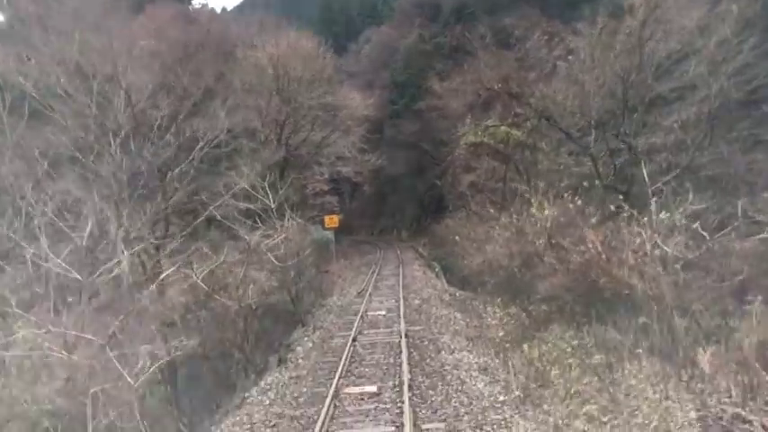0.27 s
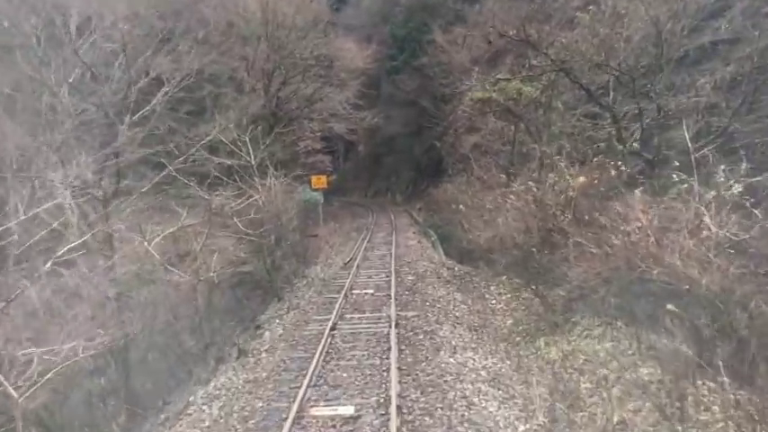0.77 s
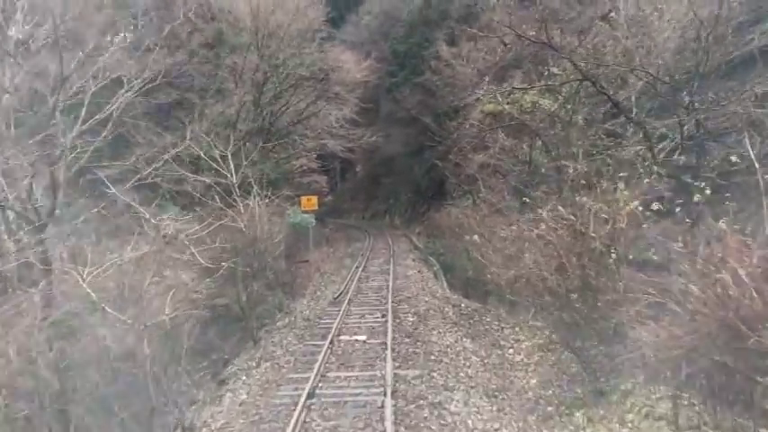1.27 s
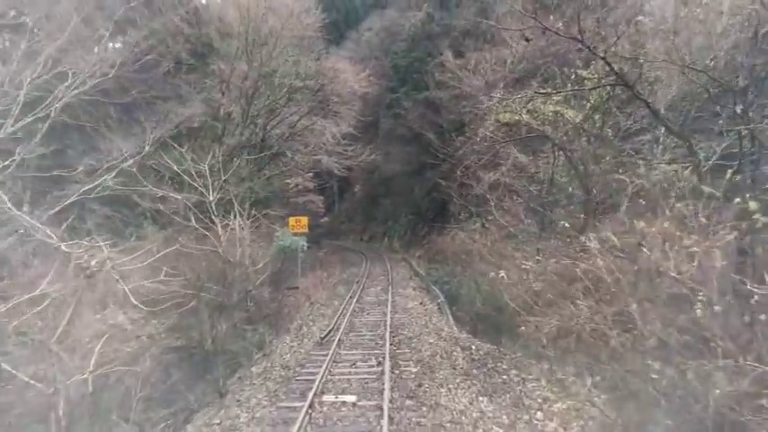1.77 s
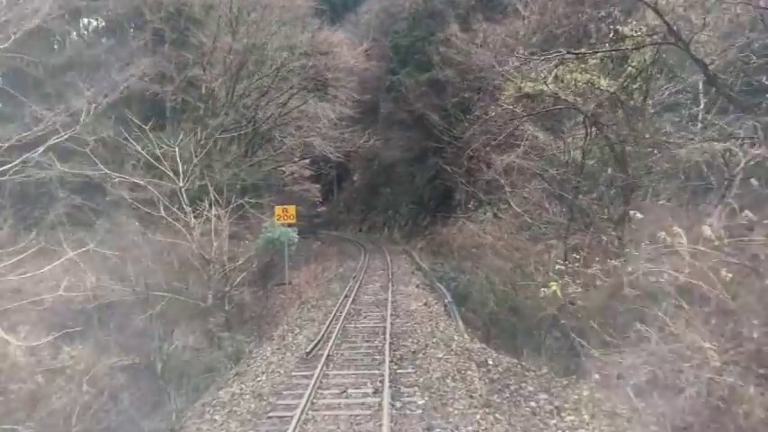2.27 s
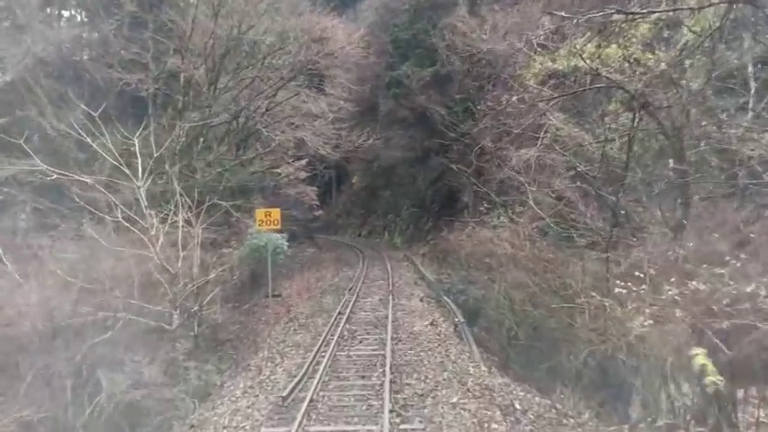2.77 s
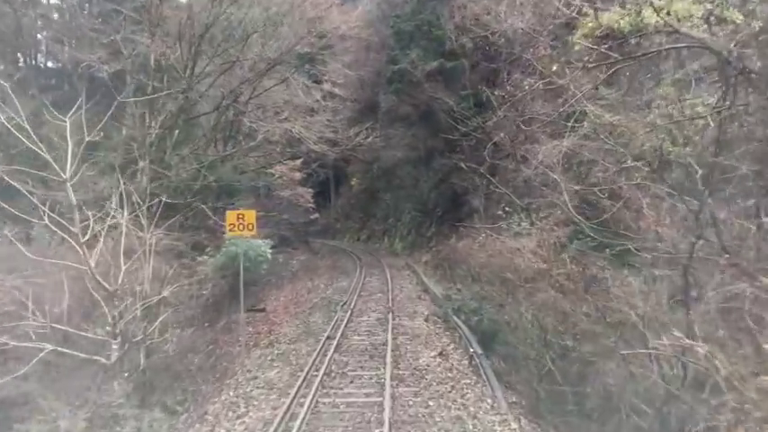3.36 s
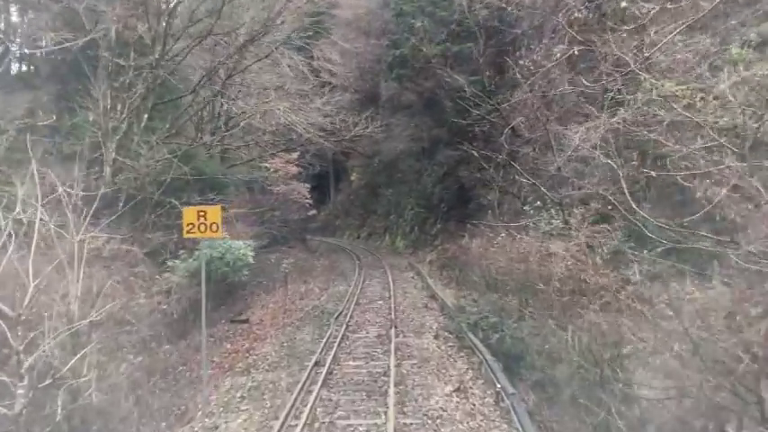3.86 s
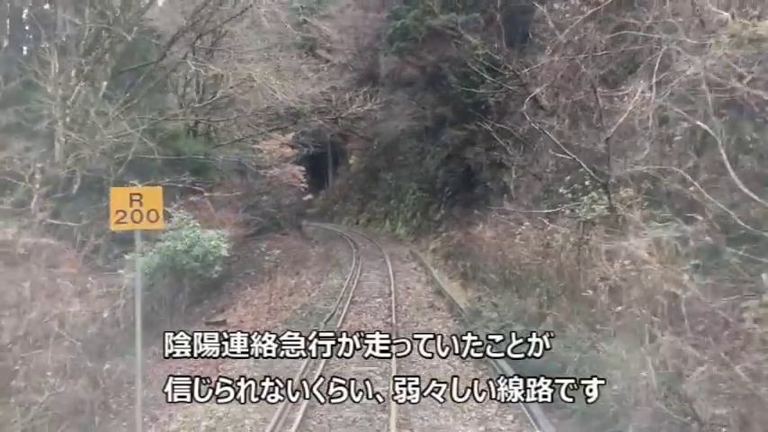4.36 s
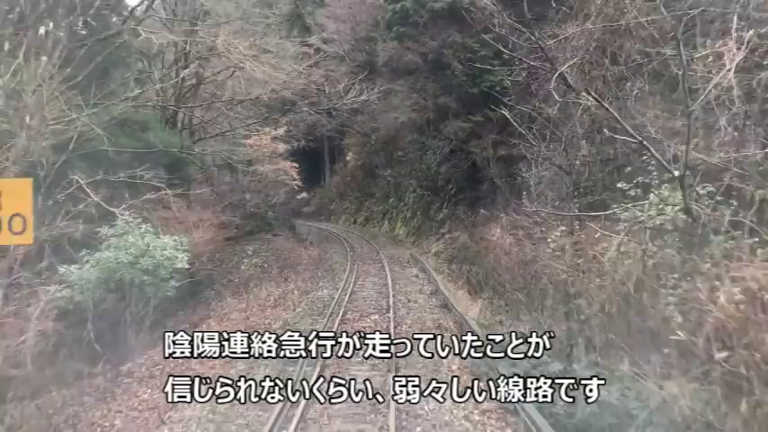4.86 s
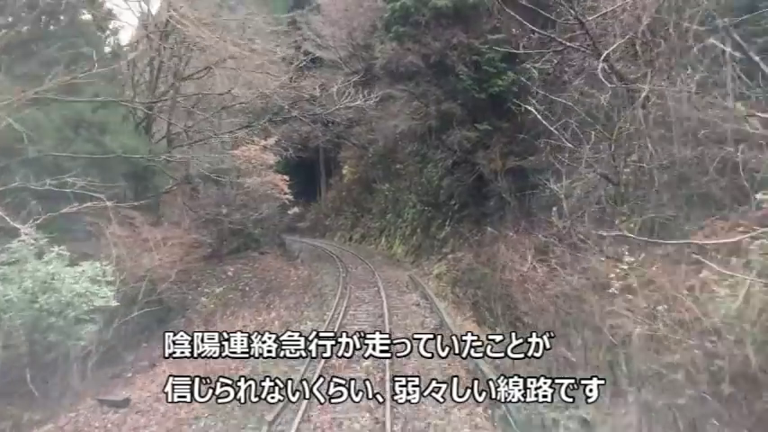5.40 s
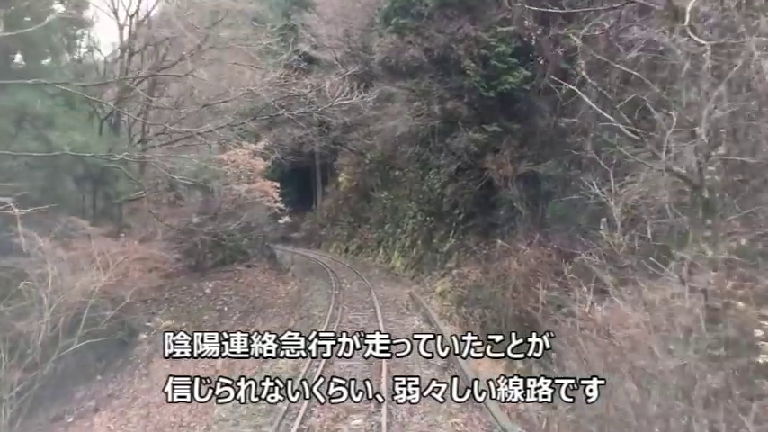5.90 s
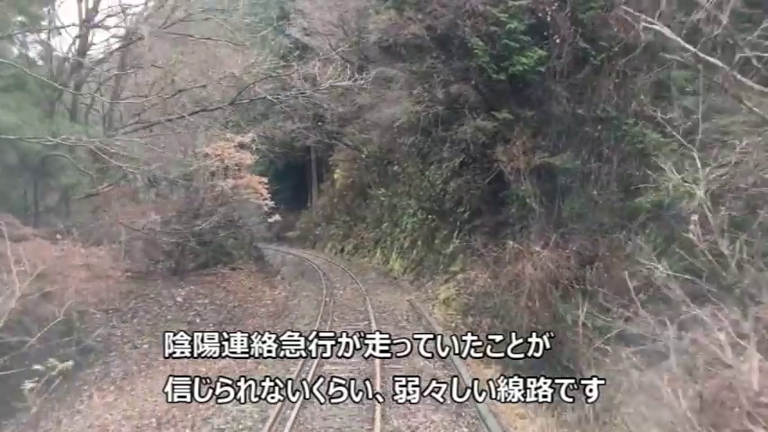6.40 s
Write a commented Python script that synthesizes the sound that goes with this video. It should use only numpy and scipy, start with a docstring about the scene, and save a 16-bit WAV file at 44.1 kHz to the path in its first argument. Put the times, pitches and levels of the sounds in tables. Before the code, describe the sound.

A diesel railcar idles with an uneven throb, ticking and knocking over rough rail, then the engine opens up and climbs into a steady boomy drone.

```python
"""A six-cylinder diesel heard from inside the cab of a slow railcar: it throbs at idle, then is opened up.
Its sound is a sum of sines locked to the firings; the firing note and its octave boom in the car body.
Shaped noise makes the rumble, roar and grinding of the wheels below and the hiss of air; geared parts
and auxiliary machines whine as wavering sines. Something loose ticks close by as brief ringing modes,
knocks come up through the floor, low booms die away, and twigs swish along the side as bursts of noise."""
import sys
import numpy as np
from scipy import signal
from scipy.fft import rfft, irfft, next_fast_len
from scipy.io import wavfile

SR = 44100
rng = np.random.default_rng(int(sys.argv[2]) if len(sys.argv) > 2 else 0)


def digitize_waveform(pressure):
    """Quantize a signal to 16-bit integers and store it at the path in sys.argv[1].

    Rows of a 2-D input are taken as channels; values are limited to [-1, 1].
    """
    field = np.atleast_2d(pressure).T
    bounded = np.clip(field, -1, 1)
    quanta = np.round(bounded * 32767).astype(np.int16)
    wavfile.write(sys.argv[1], SR, quanta)


N = 292824
TIME = np.arange(N) / SR   # seconds


def from_db(db):
    """Decibels to an amplitude factor."""
    return 10 ** (np.asarray(db) / 20)


def rms_one(x):
    """Scale a signal to rms 1."""
    return x / np.sqrt(np.mean(np.abs(x) ** 2) + 1e-20)


def in_time(rows):
    """Each column of a curve table, at every sample."""
    s, *columns = np.transpose(rows)
    return [np.interp(TIME, s, c) for c in columns]


def drift(rate):
    """Slow chance of spread 1 that changes about `rate` times a second."""
    step = 40   # samples between the points that are drawn
    r = np.exp(-2 * np.pi * rate * step / SR)
    chance = rng.standard_normal(N // step + 2002)
    slow = signal.lfilter([1], [1, -2 * r, r * r], chance)[2000:]   # the filter has settled by then
    return np.interp(np.arange(N) / step, np.arange(len(slow)), rms_one(slow))


def noise(colour):
    """Noise with a given spectrum, falling away beyond its ends; rms 1."""
    size = next_fast_len(N)
    hz = np.maximum(np.fft.rfftfreq(size, 1 / SR), 1)
    points, db = np.transpose(colour)
    upper_skirt = 1 / (1 + (hz / points.max() / 2) ** 4)
    lower_skirt = 1 / (1 + (points.min() / 2 / hz) ** 4)
    gain = from_db(np.interp(np.log(hz), np.log(points), db)) * upper_skirt * lower_skirt
    return rms_one(irfft(rfft(rng.standard_normal(size)) * gain, size)[:N])


def ring(clicks, hz, t60):
    """A unit click sets a sine of height 1 ringing; it falls 60 dB in t60 seconds."""
    r = from_db(-60 / (t60 * SR))
    w = 2 * np.pi * hz / SR
    return signal.lfilter([0, np.sin(w)], [1, -2 * r * np.cos(w), r * r], clicks + 1e-18)


def burst(start, t60, rise):
    """Envelope that rises quickly and dies away."""
    age = np.maximum(TIME - start, 0)
    return (1 - np.exp(-age / rise)) * np.exp(-np.log(1000) * np.minimum(age / t60, 10))


def tone(turns):
    """Sine of rms 1 that starts anywhere in its cycle."""
    return np.sqrt(2) * np.cos(2 * np.pi * (turns + rng.random()))


def lift_db(hz, resonances):
    """Level gained or lost by a tone at pitch `hz` near each resonance."""
    return sum(db / (1 + ((hz - centre) / width) ** 2) for centre, width, db in resonances)


def by_load(levels_db, load):
    """Level between its idling and its pulling value."""
    idle_db, pull_db = levels_db
    return idle_db + load * (pull_db - idle_db)


def stretches(rows, base_db, attack, release):
    """Gain that swells as the car enters each stretch, holds, and dies back to a base level."""
    power = from_db(base_db) ** 2
    for start, end, db in rows:
        swell = 1 - np.exp(-np.maximum(TIME - start, 0) / attack)
        fall = np.exp(-np.maximum(TIME - end, 0) / release)
        power = power + (from_db(db) * swell * fall) ** 2
    return np.sqrt(power)


def air_hiss():
    """Airy noise whose level slowly eases and flickers slightly."""
    # Each row: frequency in Hz, relative level in dB per Hz.
    air_colour = [(1000, -11), (1600, -5), (2150, 1), (2650, -1), (3200, 3), (3750, -4.5), (4200, -4.5),
                  (4800, -14), (5400, -8.5), (6400, -14), (7400, -21), (8800, -22), (10000, -26.5),
                  (11200, -25), (15500, -30)]
    start_db, fall_db_per_s, flicker_db = -46.5, 0.32, 0.78
    level_db = start_db - fall_db_per_s * TIME + flicker_db * drift(20)
    return from_db(level_db) * noise(air_colour)


def floor_rumble(load):
    """The floor shudders as the engine runs unevenly and calms as it pulls; the running gear sways deeply."""
    # Spectra of shudder and sway. Each row: frequency in Hz, relative level in dB per Hz.
    rumble_colour = [(18, -25), (30, -15.5), (42, -2.5), (55, 0), (80, -1), (120, -1), (175, -9), (205, -9),
                     (235, -11), (330, -23), (450, -43)]
    sway_colour = [(22, -26), (35, -11), (52, 1), (62, 0)]
    # Shudder level: idling in dB, pulling in dB.
    shudder_db = (-27, -35)
    calming, sway_db = 2.2, -35.5   # exponent of the load; dB
    shudder = from_db(by_load(shudder_db, load ** calming)) * noise(rumble_colour)
    return shudder + from_db(sway_db) * noise(sway_colour)


def wheel_roar(firings, load):
    """Rough rolling noise that grows a little with load and pulses slightly with each firing."""
    # Each row: frequency in Hz, relative level in dB per Hz.
    roar_colour = [(150, -10.5), (250, -0.5), (320, 1), (390, -2), (470, 1), (600, -5), (770, -8),
                   (950, -9), (1150, -11.5), (1400, -16), (2100, -21.5), (3000, -34)]
    # Level: idling in dB, pulling in dB.
    roar_db = (-42.5, -42)
    clatter, rough_db = 0.088, 1.0   # pulse depth as a fraction; spread of the level in dB
    pulsing = 1 + clatter * np.cos(2 * np.pi * firings)
    return from_db(by_load(roar_db, load) + rough_db * drift(18)) * pulsing * noise(roar_colour)


def rail_grinding():
    """Noise from under the wheels that swells on rough stretches of rail."""
    # Rough stretches. Each row: start in seconds, end in seconds, level in dB.
    rough_rail = [(0, .1, -36.5), (.49, 1.83, -35), (2.5, 3.4, -49)]
    # Each row: frequency in Hz, relative level in dB per Hz.
    grinding_colour = [(150, -5), (230, 8), (380, -3.5), (620, -2), (780, -9), (1000, -7.5), (1300, -12),
                       (1650, -16), (2100, -14.5), (2700, -29), (4000, -42)]
    smooth_rail_db, attack_s, release_s, grind_db = -57, 0.039, 0.17, 1.5
    rail = stretches(rough_rail, smooth_rail_db, attack_s, release_s)
    return rail * from_db(grind_db * drift(30)) * noise(grinding_colour)


def faint_tones(wander_hz=4.0, waver_db=1.5, fade=.15):
    """Faint tones that fade in, waver and fade out."""
    # Each row: start in seconds, end in seconds, pitch in Hz, level in dB.
    tone_spans = [(0.52, 1.93, 995, -48.5), (2.14, 2.8, 995, -51), (0.52, 1.2, 1992, -57),
                  (2.6, 4.2, 335, -50), (2.8, 3.9, 1300, -63), (4.8, 5.8, 501, -53),
                  (6.05, 6.55, 1226, -53.5), (6.0, 6.55, 1500, -58.5)]
    out = 0
    for start, end, hz, db in tone_spans:
        gate = np.clip(np.minimum(TIME - start, end - TIME) / fade + .5, 0, 1)
        turns = np.cumsum(hz + wander_hz * drift(15)) / SR
        out = out + gate * from_db(db + waver_db * drift(18)) * tone(turns)
    return out


def low_booms(rise=.015):
    """Low booms that rise quickly and die away: floor swings and a brief surge of the idling engine."""
    # Each row: start in seconds, pitch in Hz, level in dB, 60 dB decay in seconds.
    boom_rows = [(.16, 68.1, -19, 0.43), (.375, 108.4, -11, 0.38), (.68, 205, -22, .25),
                 (1.745, 52.3, -19.5, 0.49), (2.07, 104, -15, .15), (3.67, 82, -9.5, 0.3)]
    return sum(from_db(db) * burst(start, t60, rise) * tone(hz * TIME)
               for start, hz, db, t60 in boom_rows)


def knocks(rise=0.00076, thud_db=-3):
    """Running-gear clanks come up through the floor: a dull noise thud and a brief ring of steel."""
    # Each row: start in seconds, level in dB, 60 dB decay of the thud in seconds.
    clanks = [(1.585, -40, .04), (1.738, -27, 0.13), (1.809, -39, .1), (2.045, -35.5, 0.063),
              (3.325, -38, 0.5)]
    # Spectrum of the thud. Each row: frequency in Hz, relative level in dB per Hz.
    thud_colour = [(200, 9), (600, 9), (1200, -1), (1700, -10), (2300, -7.5), (2800, -15), (5000, -29)]
    # Ringing steel parts. Each row: pitch in Hz, relative level in dB, 60 dB decay in seconds.
    steel_modes = [(576, 0.5, 0.075), (1005, -7, 0.071), (1565, -4.5, 0.032), (1810, -5, 0.022),
                   (2116, -4, .06), (2335, -6.5, .04)]
    envelope = sum(from_db(db) * burst(start, t60, rise) for start, db, t60 in clanks)
    out = from_db(thud_db) * envelope * noise(thud_colour)
    clicks = np.zeros(N)
    for start, db, _ in clanks:
        clicks[int(start * SR)] = from_db(db)
    for hz, db, t60 in steel_modes:
        out = out + from_db(db) * rng.choice([-1, 1]) * ring(clicks, hz, t60)
    return out


def twigs(grain_db=1.35, rise=0.0014):
    """Scratchy rustle of bushes along the car, with a swish for each twig; hard twigs add a sharp top."""
    # Bushes. Each row: start in seconds, end in seconds, level in dB.
    bushes = [(1.3, 1.85, -53), (3.35, 4.0, -57.5), (4.6, 4.9, -66), (6.2, 6.4, -56)]
    # Twigs. Each row: start in seconds, level in dB, 60 dB decay in seconds, sharp top in dB re the swish.
    swishes = [(.216, -43.5, 0.32, -24), (.476, -44, .02, -10), (.755, -53, 0.2, 5),
               (.924, -46.5, 0.27, -16), (1.125, -50.5, .17, -10), (1.194, -45, 0.39, -22),
               (1.276, -42.5, 0.28, -8), (1.455, -47, 0.28, -18), (1.585, -45.5, 0.24, -11),
               (2.07, -49, 0.33, -11), (5.741, -45.5, 0.07, -2), (6.289, -49, .1, -14)]
    # Each row: frequency in Hz, relative level in dB per Hz.
    rustle_colour = [(2500, -15), (4000, -2), (5600, 1.5), (7000, -3), (9000, -11.5), (10200, -15),
                     (12000, -16), (15500, -18.5)]
    open_track_db, attack_s, release_s = -65, .08, 0.1
    body = stretches(bushes, open_track_db, attack_s, release_s)
    top = 0
    for start, db, t60, top_db in swishes:
        stroke = from_db(db) * burst(start, t60, rise)
        body = np.hypot(body, stroke)   # powers add
        top = top + from_db(top_db) * stroke
    sharp = noise([(5000, -10), (8500, -1.5), (10200, -5), (12500, -6.5), (15500, -5)])
    return (body * noise(rustle_colour) + top * sharp) * from_db(grain_db * drift(150))


def ticks(bounce_s=0.00095, softness_hz=7500):
    """A small loose part close by touches twice in quick succession and rings very briefly."""
    # Each row: start in seconds, level in dB.
    touches = [(0.0774, -20.5), (0.0904, -23), (0.099, -24.5), (0.1077, -28), (0.134, -31), (0.1779, -22),
               (0.2148, -19), (0.2739, -17.5), (0.3233, -21.5)]
    # Each row: pitch in Hz, relative level in dB, 60 dB decay in seconds.
    part_modes = [(623, -8, 0.023), (970, -14, 0.012), (1360, -9.5, 0.009), (2320, -15, 0.0025),
                  (3180, -7.5, 0.0057), (4200, -7.5, 0.0056), (5300, -12, 0.0039), (6040, -31, 0.0033),
                  (9000, -28, .002), (13400, -18, 0.0018)]
    starts, db = np.transpose(touches)
    gaps = bounce_s * rng.uniform(.7, 1.34, len(db))
    first = (starts * SR).astype(int)
    second = ((starts + gaps) * SR).astype(int)
    out = 0
    for hz, mode_db, t60 in part_modes:
        chance_db = 2 * rng.standard_normal((len(db), 2))
        strengths = from_db(db[:, None] + mode_db + chance_db)
        clicks = np.zeros(N)
        clicks[first] = strengths[:, 0]
        clicks[second] += strengths[:, 1]
        out = out + ring(clicks, hz, t60)
    return signal.sosfilt(signal.butter(1, softness_hz, fs=SR, output="sos"), out)


def auxiliaries(load, waver_db=1.5):
    """Auxiliary machines at their own speeds: tones that wander in pitch about a fixed centre."""
    # Each row: pitch in Hz, width in Hz, level idling in dB, level pulling in dB.
    machines = [(337.5, 3, -55, -54), (497, 6, -57, -57.5), (595, 5, -53, -56), (836.4, 1.5, -52.5, -60),
                (993, 12, -63, -61.5), (1190, 8, -59.5, -65.5), (1394, 0.92, -58.5, -67),
                (1494, 10, -60, -66.5), (3016, 1.9, -60.5, -73.5), (7083, 1.8, -82.5, -85.5),
                (7917, 2, -84, -87), (8300, 1, -76.5, -82.5)]
    out = 0
    for hz, width, *levels_db in machines:
        turns = np.cumsum(hz + width * 0.573 * drift(12)) / SR   # wander is a share of the width
        out = out + from_db(by_load(levels_db, load) + waver_db * drift(1.5)) * tone(turns)
    return out


def driven_parts(firings, load, slip=0.11, waver_db=2.5):
    """Belt and gear whines that climb with the engine; their drives slip by a fraction of a turn."""
    # Geared parts. Each row: multiple of the firing rate, level idling in dB, level pulling in dB.
    geared = [(7.09, -60.5, -55), (8.56, -65, -56), (9.94, -53, -61.5), (10.17, -53.5, -60.5),
              (17.31, -66, -61.5), (20.43, -66.5, -64), (21.3, -74, -66.5)]
    # Panels that ring as the belt whine passes. Each row: pitch in Hz, half width in Hz, lift in dB.
    panels = [(297.2, 4.5, 11), (331, 4, 11)]
    # Belt whine: level idling in dB, level pulling in dB.
    belt_db = (-42, -55)
    whine_turns = 4.96 * firings
    whine_hz = np.gradient(whine_turns) * SR
    whine_db = by_load(belt_db, load) + lift_db(whine_hz, panels)
    out = from_db(whine_db) * tone(whine_turns + 0.049 * drift(3))
    for multiple, *levels_db in geared:
        level_db = by_load(levels_db, load) + waver_db * drift(3.6)
        out += from_db(level_db) * tone(multiple * firings + slip * drift(4.5))
    return out


def throb(firings, throttle, uneven_db=1.56, throb_lead=.03, scatter=0.18, looseness=0.11):
    """The weaker orders of unequal cylinders make the engine throb once a working cycle."""
    # Each row: multiple of the working cycle rate, level idling, revving up and pulling, all in dB.
    orders = [(3, -56, -53, -46.5), (5, -42, -42.5, -43), (7, -32, -30, -34.5), (8, -38.5, -38, -46.5),
              (9, -36.5, -31, -29), (10, -50, -33.5, -33), (11, -47, -32, -41), (13, -31, -41.5, -32),
              (14, -35, -36.5, -46), (15, -29.5, -27.5, -50), (16, -51, -52, -55), (17, -45, -52.5, -46),
              (18, -39, -41, -55), (19, -45.5, -43, -54.5), (20, -49.5, -55, -56), (21, -46.5, -52, -57),
              (24, -48.5, -49, -62.5), (25, -46.5, -54.5, -57), (26, -47.5, -61, -54)]
    # Air resonance of the cab: pitch in Hz, half width in Hz, lift in dB.
    cab_mode = (199, 7.2, 11.5)
    cycles = firings / 6   # six cylinders fire in each working cycle
    cycle_hz = np.gradient(cycles) * SR
    unloaded = np.clip(1 - throttle, 0, 1)   # combustion is less even at idle
    out = 0
    for multiple, *levels_db in orders:
        k = np.round(multiple)
        level_db = np.interp(throttle, np.arange(3), levels_db)
        level_db = level_db + lift_db(k * cycle_hz, [cab_mode]) + uneven_db * drift(5.4)
        # the orders crest roughly together when the strongest cylinder fires
        stray = scatter * rng.standard_normal() + looseness * unloaded * drift(2.5)
        turns = k * (cycles + throb_lead) + stray
        out = out + from_db(level_db) * np.cos(2 * np.pi * turns)
    return np.sqrt(2) * out


def boom(firings, throttle, idle_surge_db=1.56, flutter_db=.5, octave_lead=.19):
    """Firing note and octave: surging at idle, louder on the throttle, coloured by the car body."""
    # The car body booms or cancels. Each row: pitch in Hz, half width in Hz, lift in dB.
    body_response = [(65.4, 3.6, 7), (72.5, 4, 4), (123.2, 3, 9.5), (126.84, 1.8, -25.5), (134, 1.6, 3),
                     (139.2, 2, -7)]
    # level idling in dB, gain with the throttle open in dB
    firing_note, octave = (-25.5, 7.9), (-26.5, 4.2)
    firing_hz = np.gradient(firings) * SR
    opening = np.clip(throttle, 0, 1)
    surge_db = idle_surge_db * (1 - opening) * drift(2.9)
    out = 0
    for k, (idle_db, open_db) in enumerate((firing_note, octave), 1):
        level_db = idle_db + open_db * opening + lift_db(k * firing_hz, body_response)
        level_db = level_db + surge_db + flutter_db * drift(12)
        turns = k * firings + (k - 1) * octave_lead
        out = out + from_db(level_db) * np.cos(2 * np.pi * turns)
    return np.sqrt(2) * out


def scene():
    """Engine speed and throttle drive the machinery; the other noises lie around it."""
    # Engine speed. Each row: time in seconds, firings per second.
    speed = [(0, 57.79), (0.6, 57.39), (1.4, 57.9), (1.9, 58.5), (2.35, 57.75), (2.6, 58.43), (3.1, 61.41),
             (3.6, 64.4), (4.1, 67.88), (4.5, 69.52), (5, 70.82), (5.6, 71.7), (6.64, 72.61)]
    # Each row: time in seconds, throttle state (0 idling, 1 revving up, 2 pulling).
    throttle_curve = [(0, 0), (2.45, 0.06), (2.8, 1), (3.8, 1.34), (4.4, 2), (6.64, 2.04)]
    firing_hz, = in_time(speed)
    throttle, = in_time(throttle_curve)
    firings = np.cumsum(firing_hz) / SR + .5   # running count
    load = np.clip(throttle / 2, 0, 1)
    background = air_hiss() + floor_rumble(load) + wheel_roar(firings, load) + rail_grinding()
    background = background + faint_tones() + low_booms() + knocks()
    machinery = auxiliaries(load) + driven_parts(firings, load)
    engine = throb(firings, throttle) + boom(firings, throttle)
    return (background + twigs() + ticks() + machinery + engine)[None]


def record(dry):
    """A steep elliptic low-pass cuts the top above 15.85 kHz."""
    return signal.sosfilt(signal.ellip(10, .2, 80, 15850, fs=SR, output="sos"), dry)


dry = scene()
out = record(dry)
digitize_waveform(out)
```